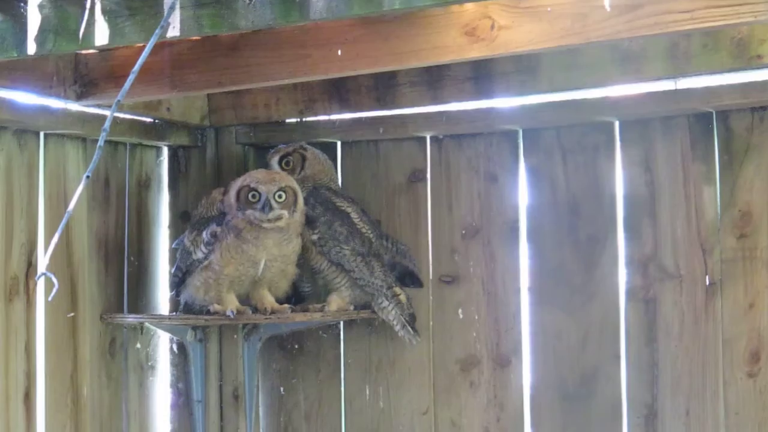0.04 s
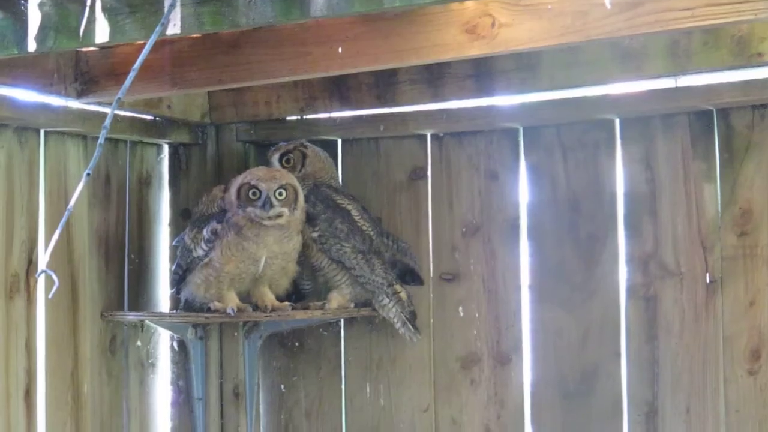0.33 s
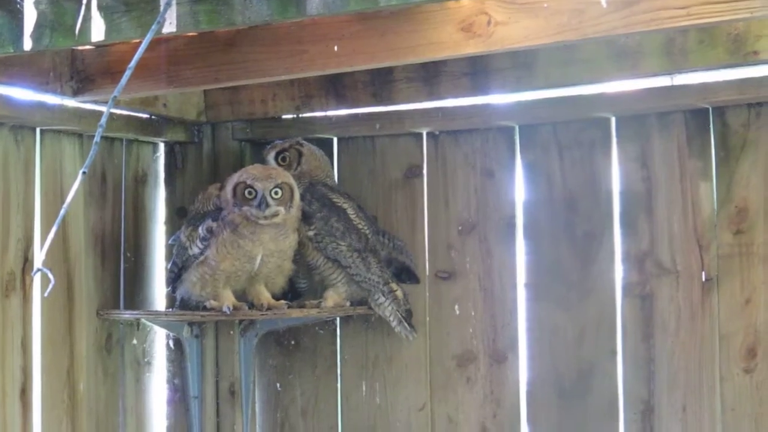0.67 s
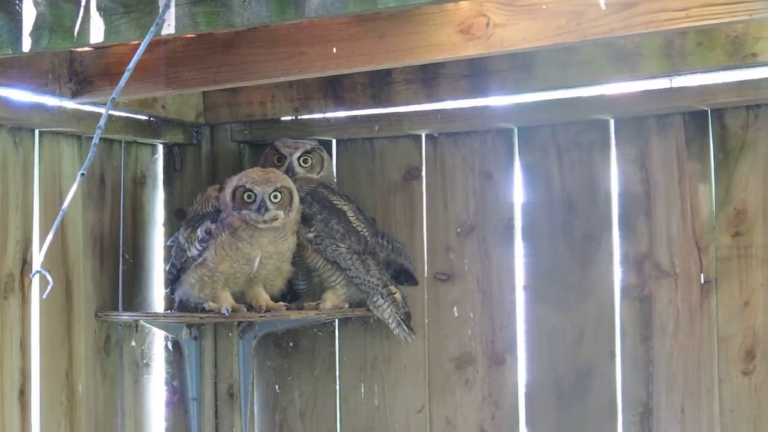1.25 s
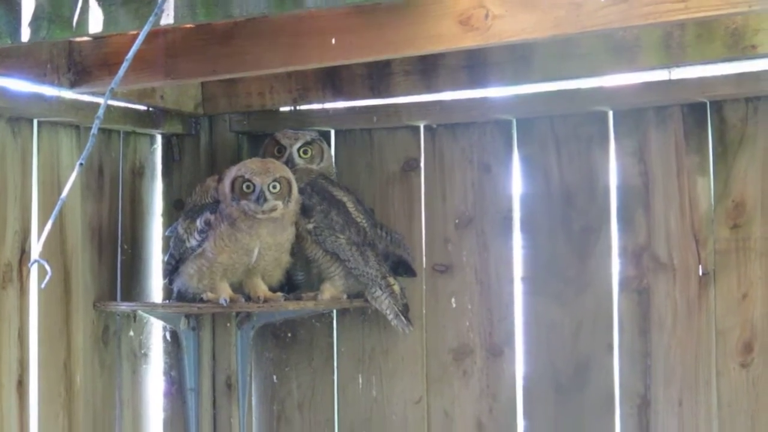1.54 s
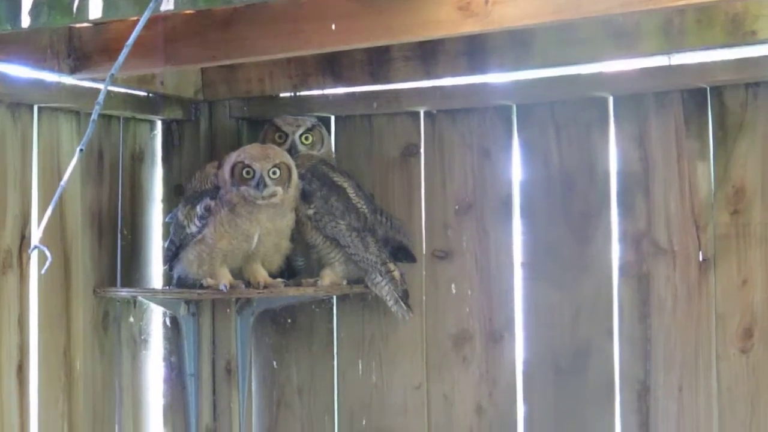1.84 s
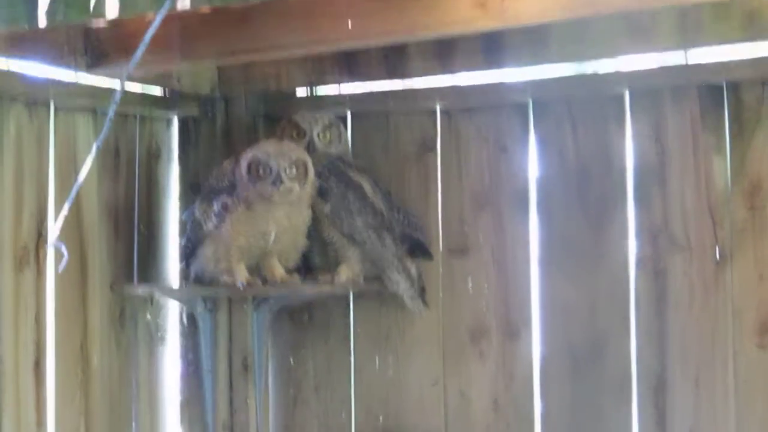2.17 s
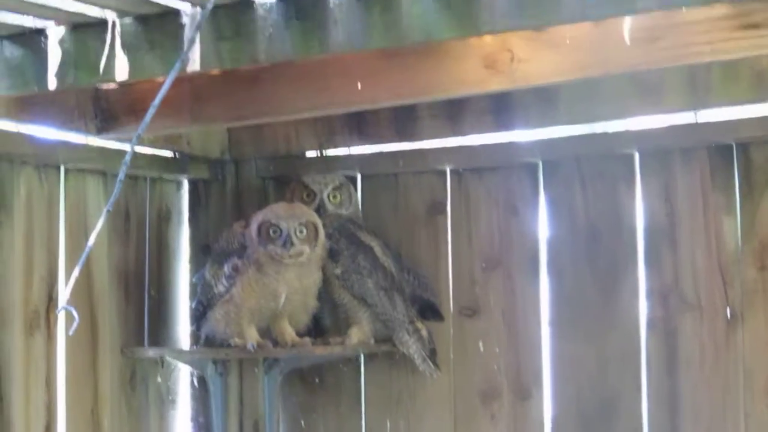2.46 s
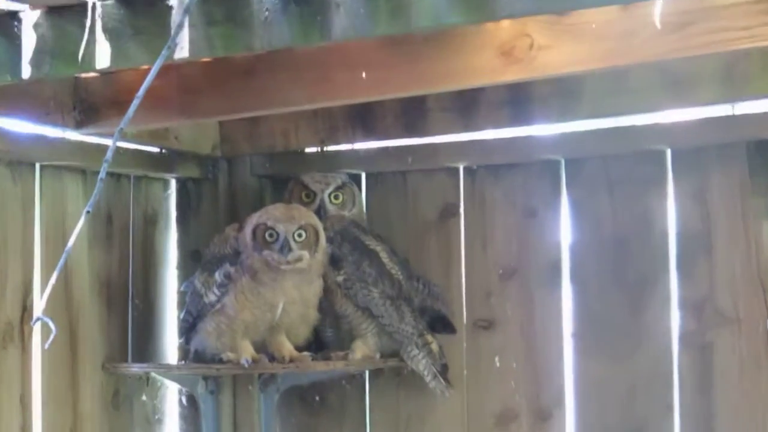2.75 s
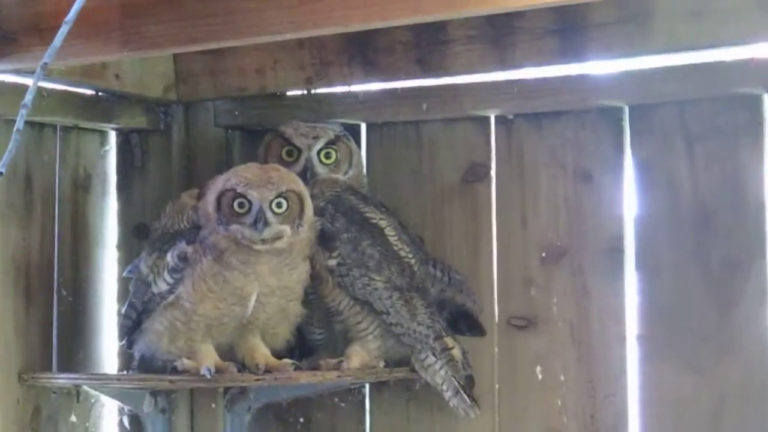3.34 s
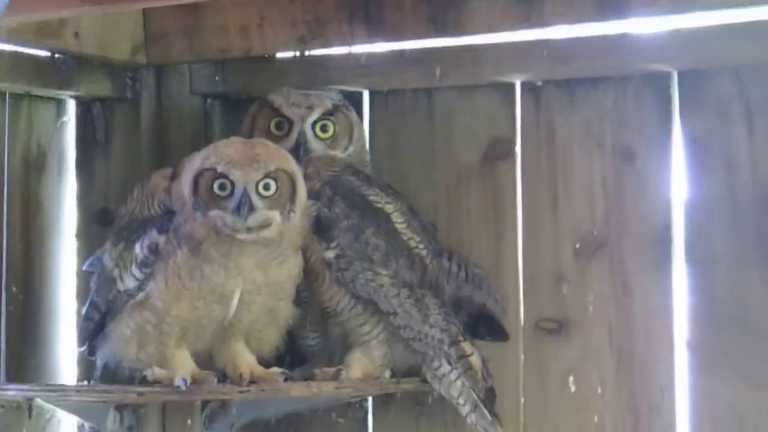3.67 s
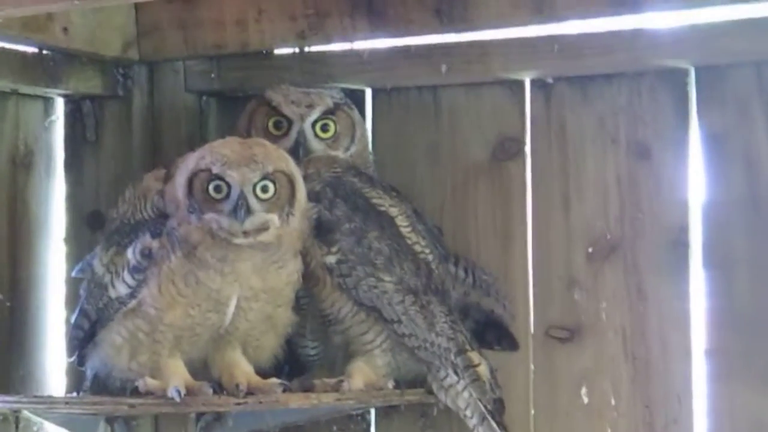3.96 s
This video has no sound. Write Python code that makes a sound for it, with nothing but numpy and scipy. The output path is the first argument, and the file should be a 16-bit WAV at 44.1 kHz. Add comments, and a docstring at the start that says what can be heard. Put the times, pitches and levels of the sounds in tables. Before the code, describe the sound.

Young owls give three short raspy falling chirps, with faint birds and a sharp handling click.

```python
"""Raspy falling chirps in a wooden enclosure

Three short, sharp, raspy falling chirps, each made of two voices: one sweeps down, one stays high.
Small birds chirp and whistle outside over a distant rumble and a faint hum; something knocks on wood
and rustles. Near the end, sharp handling clicks ring the camera's shell and overload the microphone,
and the gain control ducks and recovers."""
import sys
import numpy as np
from scipy import signal
from scipy.fft import rfft, irfft
from scipy.io import wavfile

SR = 44100
rng = np.random.default_rng(int(sys.argv[2]) if len(sys.argv) > 2 else 0)


def transcribe(u):
    """Save the signal u as a 16-bit wav file named by the first command-line argument.

    u: samples, shape (n,) or (channels, n), limited to [-1, 1]; the rate is SR.
    q: integer samples, one column per channel.
    """
    v = np.clip(np.atleast_2d(u).T, -1, 1)
    q = np.round(v * 32767).astype(np.int16)
    wavfile.write(sys.argv[1], SR, q)


N = 176400
TIME = np.arange(N) / SR

# handling clicks on the camera: (time [s], level [dB], contact hardness [Hz], lowest mode's trim [dB])
HANDLING_CLICKS = [(3.567, -13.5, 5040, -4), (3.569, -11.5, 5040, -8), (3.5702, -2.5, 4970, 12),
                   (3.5932, 11.5, 6900, -15.5)]


def from_db(db):
    """Decibels to gain."""
    return 10 ** (np.asarray(db) / 20)


def unit_rms(x):
    """Scale to unit power."""
    return x / np.sqrt(np.mean(x ** 2) + 1e-20)


def at_hz(points, hz):
    """Read a curve on a log-frequency axis."""
    f, value = np.transpose(points)
    return np.interp(np.log(np.maximum(hz, 1)), np.log(f), value)


def fader(points):
    """Gain over time from (time [s], level [dB]) points."""
    return from_db(np.interp(TIME, *np.transpose(points)))


def colour(x, points):
    """Equalise a sound with a (frequency [Hz], gain [dB]) curve."""
    return irfft(rfft(x) * from_db(at_hz(points, np.fft.rfftfreq(N, 1 / SR))), N)


def drift(rate_hz):
    """Smooth random modulation at unit power."""
    r = np.exp(-2 * np.pi * rate_hz / SR)
    return unit_rms(signal.lfilter([1], [1, -2 * r, r * r], rng.standard_normal(N + SR))[SR:])


def phase_of(hz):
    """Running phase of a moving pitch."""
    return 2 * np.pi * np.cumsum(hz) / SR


def arch(start, length):
    """Envelope of one soft-edged note."""
    return np.sqrt(np.abs(np.sin(np.pi * np.clip((TIME - start) / length, 0, 1))))


def strike(start, db, t60_s):
    """Envelope of a hit: instant attack, exponential decay."""
    return from_db(db - 60 * np.maximum(TIME - start, 0) / t60_s) * (TIME >= start)


def outdoors(crossover_hz=1930, level_db=-41, flicker_db=1.0):
    """Distant rumble, alike at both ears, and a diffuse hiss that swells a little."""
    # spectrum of the outdoor air: (frequency [Hz], relative level [dB])
    air_colour = [(15, -31), (25, 2.5), (101, 1.5), (156, 0), (289, -5), (331, -7), (359, -5.5),
                  (410, -8.5), (848, -6), (1080, -10), (1410, -17), (1800, -17.5), (2300, -19), (2560, -19),
                  (3530, -16.5), (5010, -12.5), (6730, -23), (9300, -29.5), (15500, -20)]
    # the stereo image widens toward the treble: (frequency [Hz], left-right correlation [0..1])
    likeness = [(60, 1), (300, 0.96), (640, 0.94), (1400, 0.67), (3100, 0.33), (6800, .05)]
    # swell of the low band: (time [s], gain [dB])
    rumble_swell = [(.07, -1), (.55, 0), (.9, 3), (1.5, 2), (2.5, 1.5), (3.5, 1)]
    # swell of the high band: (time [s], gain [dB])
    hiss_swell = [(.07, -2.5), (.5, -4.5), (1, -2), (1.6, 0), (2.2, 2), (2.45, 3.5), (2.6, -1), (2.8, 2),
                  (3.5, 0.5), (4, 2.5)]
    hz = np.fft.rfftfreq(N, 1 / SR)
    alike = np.clip(at_hz(likeness, hz), 0, 1)
    mid, side = rfft(rng.standard_normal((2, N)))
    stereo = np.sqrt(1 + alike) * mid + np.sqrt(1 - alike) * side * [[1], [-1]]
    air = unit_rms(irfft(stereo * from_db(at_hz(air_colour, hz)) * (hz > 20), N))
    lows = irfft(rfft(air) / (1 + (hz / crossover_hz) ** 4), N)
    rumble = lows * fader(rumble_swell) * from_db(flicker_db * drift(10.4))
    hiss = (air - lows) * fader(hiss_swell)
    return from_db(level_db) * (rumble + hiss)


def hum(waver_hz=1.38, drone_hz=169.7, drone_waver_hz=24.1):
    """A far machine's near-steady tones, and a wavering low drone that comes and goes."""
    # the machine's tones: (pitch [Hz], level [dB])
    partials = [(118.4, -64), (353.3, -47.5), (705.2, -60), (1766, -66.5)]
    # their slow swell: (time [s], gain [dB])
    swell = [(.07, -4.5), (.6, -2.5), (1.3, 0.5), (2.3, 0), (2.8, -1), (3.5, 1)]
    # the drone's fades: (time [s], level [dB])
    drone_fades = [(.07, -44), (.3, -43.5), (.6, -49.5), (.9, -84), (2.8, -46), (3.15, -48), (3.4, -74)]
    tones = sum(from_db(db) * np.sin(phase_of(hz + waver_hz * drift(5.85))) for hz, db in partials)
    drone = np.sin(phase_of(drone_hz + drone_waver_hz * drift(23)))
    return np.sqrt(2) * (tones * fader(swell) + drone * fader(drone_fades))


def rustles(grain_db=4.4):
    """Soft brushing: swells of noise with an uneven grain."""
    # brush strokes: (start [s], length [s], level [dB])
    strokes = [(2.335, 0.21, -50), (3.866, 0.095, -43.5)]
    # their tone colour: (frequency [Hz], gain [dB])
    brush_colour = [(900, -34), (2200, 9), (3500, 3), (5500, -6), (8000, -10), (14000, -28)]
    envelope = sum(from_db(db) * arch(start, length) for start, length, db in strokes)
    grain = rng.standard_normal(N) * from_db(grain_db * drift(60))
    return envelope * unit_rms(colour(grain, brush_colour))


def knocks():
    """Each knock stirs the dense, quickly dying modes of a plank."""
    # knocks on wood: (time [s], level [dB])
    hits = [(0.8343, -21.5), (1.71, -40), (1.946, -46)]
    # the plank's resonance: (frequency [Hz], gain [dB])
    plank_colour = [(200, -27), (400, -16), (500, 4), (800, 12), (1200, -4), (2200, -6.5), (4500, -4),
                    (6000, -21), (8500, -30), (14000, -49)]
    envelope = sum(strike(start, db, t60_s=0.082) for start, db in hits)
    return envelope * unit_rms(colour(rng.standard_normal(N), plank_colour))


def faint_chirps(rasp_hz):
    """Gliding notes, made buzzy by a fast pitch jitter."""
    # (start [s], length [s], first pitch [Hz], middle pitch [Hz], last pitch [Hz], level [dB])
    notes = [(0.119, 0.055, 6600, 6200, 5500, -43), (.115, 0.02, 4820, 5500, 5970, -40),
             (.17, 0.064, 4500, 4400, 4360, -40.5), (0.233, 0.045, 4215, 3700, 2770, -42.5),
             (0.879, 0.078, 4500, 3870, 2920, -42.5), (1.136, .09, 8080, 7500, 6470, -48.5),
             (1.116, 0.11, 5340, 5900, 5920, -45), (1.41, 0.15, 3980, 5000, 3600, -44),
             (1.984, 0.076, 3500, 3894, 3510, -38.5), (2.172, 0.099, 8500, 7870, 6850, -49.5),
             (2.203, .04, 4290, 5460, 6000, -37.5), (2.212, 0.055, 6650, 6200, 5270, -34),
             (3.862, 0.088, 5500, 4220, 3510, -41)]
    out = np.zeros(N)
    for start, length, first_hz, middle_hz, last_hz, db in notes:
        hz = np.interp((TIME - start) / length, [0, .5, 1], [first_hz, middle_hz, last_hz])
        out += from_db(db) * arch(start, length) * np.sin(phase_of(hz + rasp_hz))
    return out


def whistles(waver_hz, scoop_share=.035, scoop_s=0.0141, droop_share=0.0197, lower_db=-1):
    """Thin two-voiced whistles that scoop up to pitch and droop as they end."""
    # (start [s], length [s], upper voice [Hz], lower voice [Hz], level [dB])
    notes = [(0.024, 0.085, 8850, 6500, -63), (0.215, 0.076, 8900, 6400, -58),
             (1.883, 0.17, 8930, 6260, -49), (2.123, 0.08, 9000, 6330, -49.5),
             (2.642, 0.13, 8290, 5970, -42), (2.786, 0.063, 8260, 6010, -45.5),
             (2.99, 0.14, 8200, 6000, -47.5), (3.696, 0.085, 8900, 6440, -50.5)]
    out = np.zeros(N)
    for start, length, upper_hz, lower_hz, db in notes:
        scoop = scoop_share * np.exp(-np.maximum(TIME - start, 0) / scoop_s)
        droop = droop_share * np.clip((TIME - start) / length, 0, 1) ** 2
        bend = 1 - scoop - droop
        upper = np.sin(phase_of(upper_hz * bend + waver_hz))
        lower = from_db(lower_db) * np.sin(phase_of(lower_hz * bend + waver_hz))
        out += from_db(db) * arch(start, length) * (upper + lower)
    return out


def peeps(waver_hz):
    """Short notes, each wavering around one pitch."""
    # (start [s], length [s], pitch [Hz], level [dB])
    notes = [(0.21, 0.039, 5160, -38), (2.013, 0.046, 3980, -41), (2.018, 0.062, 4285, -38.5),
             (2.06, 0.029, 2770, -43.5), (2.252, 0.017, 3206, -37), (2.262, 0.087, 2513, -45),
             (2.733, 0.073, 5190, -47.5), (3.466, .09, 3930, -42), (3.476, 0.14, 4370, -42)]
    return sum(from_db(db) * arch(start, length) * np.sin(phase_of(hz + waver_hz))
               for start, length, hz, db in notes)


def small_birds():
    """The birds outside: raspy chirps among smoother whistles and peeps."""
    rasp_hz = 257.3 * drift(247.8)
    waver_hz = 73.3 * drift(48.2) + 66.5 * drift(490)  # a wobble plus a fine haze
    return faint_chirps(rasp_hz) + whistles(waver_hz) + peeps(waver_hz)


def shell_rings(left_lag_s=.0004, thud_hz=700, thud_db=-44, thud_t60_s=0.0015):
    """Handling clicks ring the camera's shell right beside the right microphone."""
    # the shell's modes: (frequency [Hz], left level [dB], right level [dB], t60 [s])
    modes = [(1745, -20.5, -20.5, 0.021), (2295, -15, -9.5, 0.013), (3190, -15.5, -14, 0.013),
             (3700, -18.5, 2, 0.0082), (4400, -9.5, 1.5, 0.0044), (5500, -23, -1.5, 0.0034),
             (7730, -32, -13.5, 0.0012), (9700, -41, -22, .0015)]
    t = TIME[:SR // 20]
    thud = from_db(thud_db - 60 * t / thud_t60_s) * np.sin(2 * np.pi * thud_hz * t)
    out = np.zeros((2, N))
    for onset, db, hardness_hz, lowest_db in HANDLING_CLICKS:
        for ear, lag in enumerate((left_lag_s, 0)):
            ring = thud.copy()
            for k, (hz, left_db, right_db, t60) in enumerate(modes):
                contact = from_db(lowest_db * (k == 0)) / np.sqrt(1 + (hz / hardness_hz) ** 4)
                decay = from_db((left_db, right_db)[ear] - 60 * t / t60)
                ring += (-1) ** k * contact * decay * np.sin(2 * np.pi * hz * t)
            start = int((onset + lag) * SR)
            out[ear, start:start + len(t)] += from_db(db) * ring
    return out


def snaps(trim_db=-11.5, left_db=-7):
    """The brief broadband crack of each handling click."""
    # the crack's tone colour: (frequency [Hz], gain [dB])
    crack_colour = [(300, -38), (1200, -8), (3000, 5.5), (4300, -12), (5500, -1), (8000, -9), (15000, -24)]
    envelope = sum(strike(start, db + trim_db, t60_s=0.01) for start, db, _, _ in HANDLING_CLICKS)
    crack = unit_rms(colour(rng.standard_normal((2, N)), crack_colour))
    return envelope * crack * from_db([[left_db], [0]])


def falling_chirps(rasp_hz=169.2, rasp_rate_hz=253.6, flutter_db=5, overtone_db=-33):
    """A squeak leads into each sharp two-voiced chirp, which grows rough after the onset."""
    # (onset [s], level [dB], swell stretch [ratio], fall stretch [ratio], lead-in trim [dB])
    calls = [(.683, -25.5, 0.77, 0.94, -6.5), (1.763, -21, 0.98, 0.97, -5), (3.2, -23, 2, 0.75, -15)]
    # the faint high squeak: (time from onset before stretching [s], pitch [Hz], relative level [dB])
    lead_in = [(-.05, 6900, -18), (-.028, 6100, -10), (-.012, 5900, -22), (.005, 5450, -51)]
    # the voice that sweeps down: same columns
    falling_voice = [(-.028, 4030, -29), (-.01, 4350, -5.5), (-.002, 4850, 3.5), (.012, 4713, 3),
                     (.035, 4044, -2), (.07, 3750, -7.5), (.1, 3250, -3.5), (.135, 2718, -33)]
    # the voice that stays high: same columns
    high_voice = [(-.008, 4900, -14), (.004, 4800, -6), (.035, 4690, -5), (.08, 4530, -29),
                  (.13, 4400, -29)]
    onset_rasp_share, roughen_s = 0.44, 0.044
    out = np.zeros(N)
    for voice in (lead_in, falling_voice, high_voice):
        times, hz, db = np.transpose(voice)
        rasp = rasp_hz * drift(rasp_rate_hz)
        flutter = unit_rms(from_db(flutter_db * drift(rasp_rate_hz)))
        for onset, level_db, swell, fall, lead_db in calls:
            age = (TIME - onset) / np.where(TIME < onset, swell, fall)
            roughness = np.interp(np.abs(age), [0, roughen_s], [onset_rasp_share, 1])
            phase = phase_of(np.interp(age, times, hz) + roughness * rasp)
            tone = np.sin(phase) + from_db(overtone_db) * np.sin(2 * phase)
            envelope = from_db(level_db + lead_db * (voice is lead_in) + np.interp(age, times, db))
            sounding = (age > times[0]) & (age < times[-1])
            out += sounding * envelope * flutter * tone
    return out


def enclosure(x, wet_db, t60_s=0.42, predelay_s=0.0021):
    """Direct sound plus dense reflections off the planks, different at each ear; power is kept."""
    t = TIME[:SR]
    tails = rng.standard_normal((2, SR)) * from_db(-60 * t / t60_s) * (t > predelay_s)
    tails /= np.sqrt(np.sum(tails ** 2, axis=1, keepdims=True))
    reflections = signal.fftconvolve(x[None], tails, axes=1)[:, :N]
    wet = from_db(wet_db)
    return (x + wet * reflections) / np.sqrt(1 + wet ** 2)


def scene():
    """Airborne sound passes two differently coloured microphones; the clicks come through the body."""
    # each microphone's response: (frequency [Hz], gain [dB])
    left_mic = [(100, -1.5), (700, -3.7), (1700, 2), (3000, 1.5), (4000, 2.5), (5000, 4.5), (5900, 1),
                (7000, -3), (8500, -5.5), (11000, -10)]
    right_mic = [(100, -4.4), (700, -4.7), (1700, -1), (3000, -0.5), (4000, -2), (5000, -6), (5900, 3),
                 (7000, 9), (8500, 3), (11000, -10)]
    calls = enclosure(falling_chirps(), wet_db=8) + enclosure(small_birds(), wet_db=4.5)
    movement = enclosure(knocks() + rustles(), wet_db=-2.5)
    left, right = calls + movement + outdoors() + hum()
    airborne = np.array([colour(left, left_mic), colour(right, right_mic)])
    return airborne + shell_rings() + snaps()


def record(dry):
    """Sound begins after a brief silence; the recorder ducks after overloads and recovers slowly; peaks clip
    and the top is cut."""
    # the recorder's treble roll-off: (frequency [Hz], gain [dB])
    treble_loss = [(11000, 0), (15000, -11.5)]
    threshold_db, attack_s, recover_db_per_s = -3, 0.017, 21.5
    start_s, clip_level, cutoff_hz = 0.073, 0.82, 15800
    peak_db = 20 * np.log10(np.abs(dry).max(axis=0) + 1e-9)
    over_db = np.maximum(peak_db - threshold_db, 0)
    recovery_db = recover_db_per_s * TIME
    held_db = np.maximum.accumulate(over_db + recovery_db) - recovery_db
    r = np.exp(-1 / (attack_s * SR))
    duck_db = signal.lfilter([1 - r], [1, -r], held_db)
    clipped = np.clip(dry * from_db(-duck_db) * (TIME > start_s), -clip_level, clip_level)
    lowpass = signal.ellip(10, .1, 80, cutoff_hz, fs=SR, output="sos")
    return signal.sosfilt(lowpass, colour(clipped, treble_loss))


dry = scene()
out = record(dry)
transcribe(out)
```